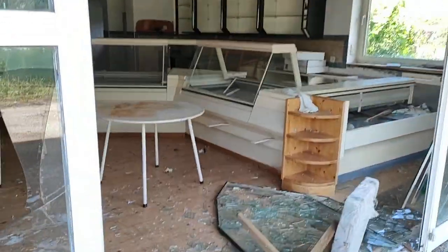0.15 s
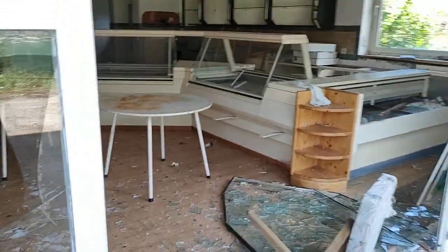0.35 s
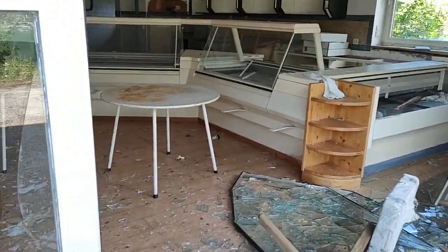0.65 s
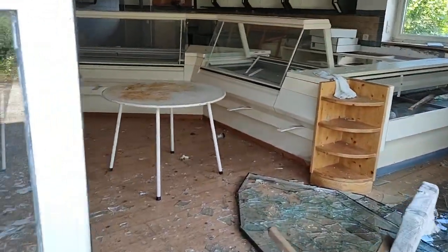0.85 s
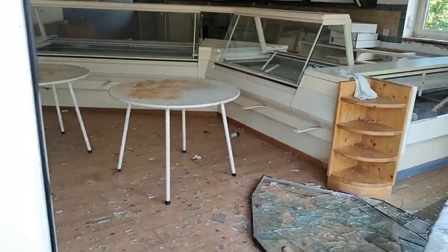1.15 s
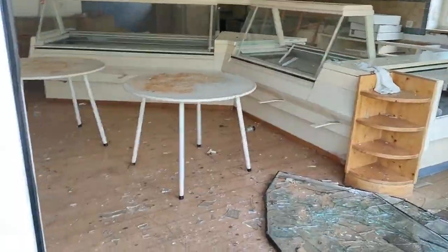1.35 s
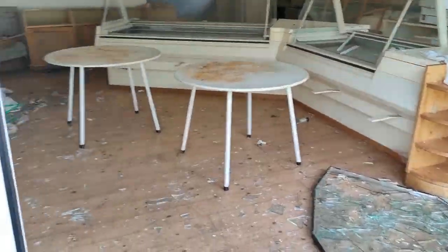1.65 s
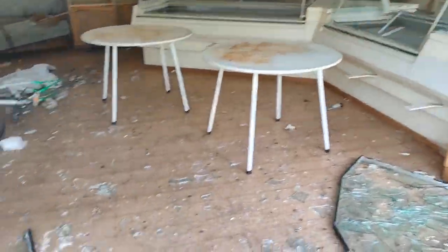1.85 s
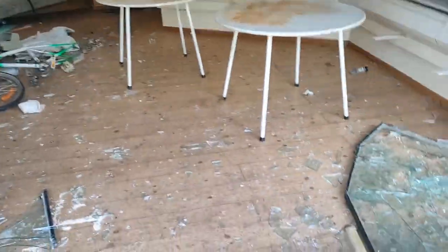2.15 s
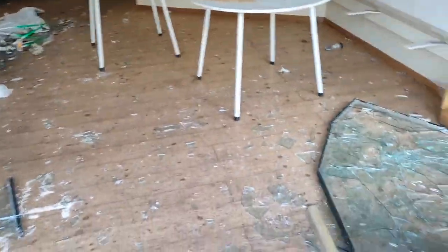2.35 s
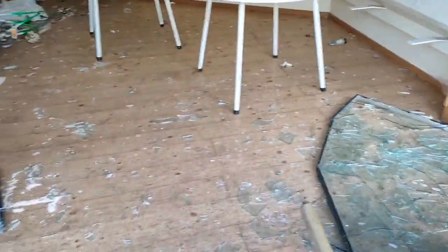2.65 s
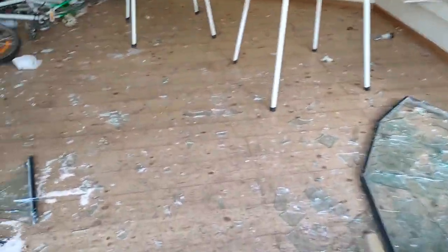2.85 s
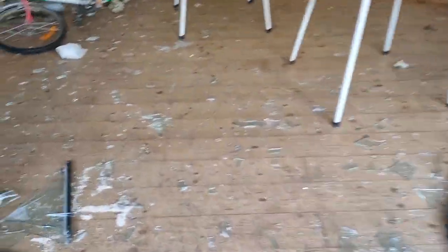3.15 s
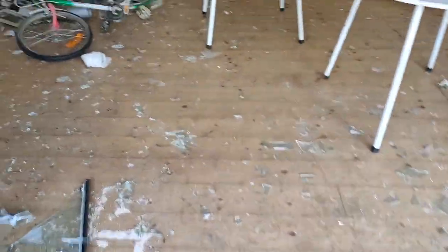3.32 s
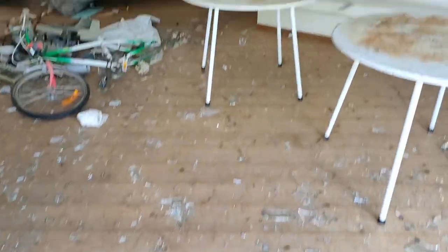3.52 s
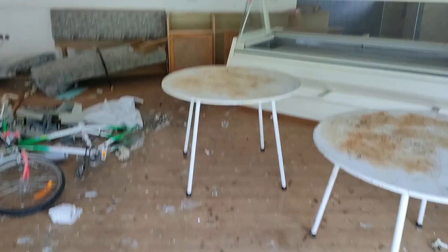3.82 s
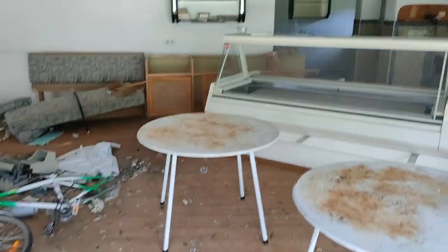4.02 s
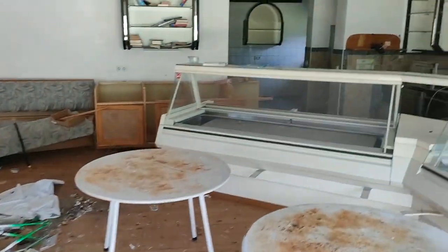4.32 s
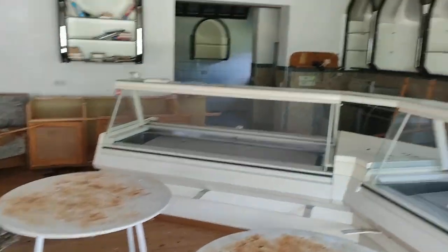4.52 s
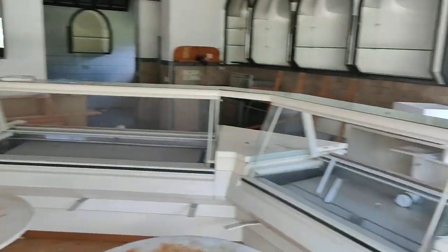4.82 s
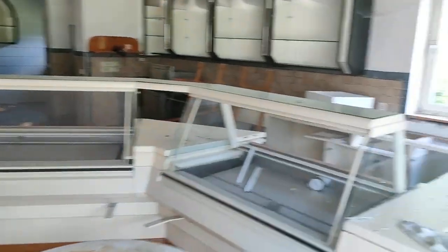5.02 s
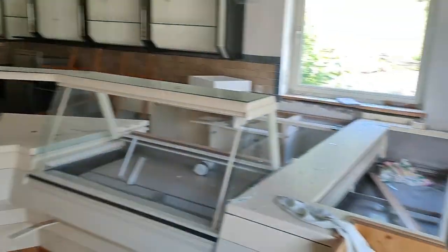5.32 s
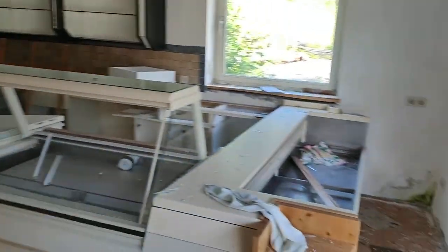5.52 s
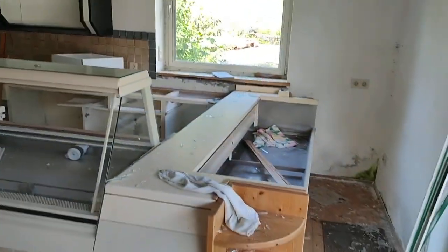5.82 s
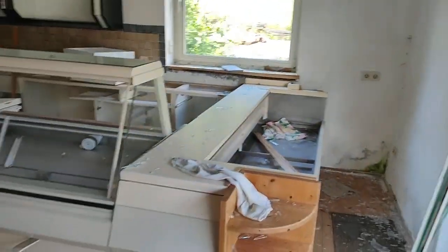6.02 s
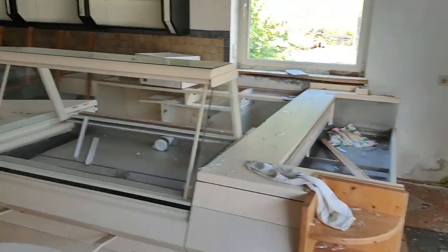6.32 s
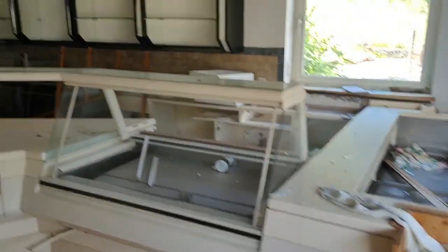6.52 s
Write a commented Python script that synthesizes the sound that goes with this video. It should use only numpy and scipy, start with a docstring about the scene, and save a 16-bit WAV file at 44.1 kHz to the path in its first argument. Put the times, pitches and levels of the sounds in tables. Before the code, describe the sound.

A walker carrying a phone slowly enters an abandoned shop over glass debris. Light cracking and a short lull lead to hard, bright breaking underfoot around three seconds, then denser grit, floor knocks and loose pieces ringing briefly. The later steps are softer, with a small scrape and clinks in the room's short echo, over faint outdoor rumble.

```python
"""Slow steps over broken glass on the floor of an empty shop, heard from a phone held by the walker.
From the start a low rumble and soft hiss (coloured noise) lie under grit ground by the sole (dense clicks)
and shards snapping in runs of fractures (click bursts with a pinched ring); heels thud (short low noise).
Two far hoots (sines) and trouser brushes (noise swells) come next, then pieces dragged with a rasp (resonant
stick-slip) and later ones clinking (beating, decaying modes); the bare room (echo) rings on throughout."""
import sys
import numpy as np
from scipy import signal
from scipy.fft import rfft, irfft
from scipy.io import wavfile
from scipy.ndimage import map_coordinates

SR = 44100
rng = np.random.default_rng(int(sys.argv[2]) if len(sys.argv) > 2 else 0)


def unload_wav(signal):
    """Save mono or channel-first audio to the path in sys.argv[1] as 16-bit WAV at rate SR, clipped to [-1, 1]."""
    wavfile.write(
        sys.argv[1],
        SR,
        np.round(np.clip(np.atleast_2d(signal).T, -1, 1) * 32767).astype(np.int16),
    )


N = 294401
TIME = np.arange(N) / SR

# All event levels are mix levels, set before the room and the limiter.
# steady bed, outdoor rumble and hiss: [pitch_hz, level_db per Hz]
AMBIENCE_COLOUR = [(15, -3.5), (30, 1.5), (42, -3), (58, 7), (75, -8.5), (110, -19), (200, -18.5),
                   (300, -22.5), (700, -29), (2000, -37), (6300, -36), (7300, -46.5), (8300, -59.5),
                   (14000, -52.5), (15900, -84.5)]
# faint far hoots: [centre_s, half_length_s, pitch_hz, level_db]
HOOTS = [(.7, .04, 1300, -63), (2.48, .075, 614, -55)]
# the sole bears down on grit: [start_s, build_up_s, hold_s, grit_db, floor_resonance_db, boards_db]
PRESSES = [(0.005, 0.07, 0.06, -33.5, -41, -68), (0.188, .09, 0.144, -55.5, -55.5, -48),
           (1.358, .02, 0.27, -46, -56, -53), (2.932, .02, 0.081, -43, -79, -55.5),
           (3.117, 0.059, 0.025, -31, -28.5, -74), (3.278, .012, 0.18, -23, -50, -57.5),
           (3.574, 0.016, 0.16, -32.5, -65, -44.5), (3.754, 0.12, 0.23, -35.5, -64, -55),
           (4.037, 0.12, 0.24, -35, -46, -51.5), (4.198, 0.11, 0.031, -30, -41, -40.5),
           (4.245, 0.027, 0.2, -33, -34.5, -33.5), (4.475, 0.12, 0.16, -30.5, -33.5, -45),
           (4.607, .012, 0.11, -28.5, -30.5, -39), (4.692, 0.068, 0.028, -22.5, -29, -30),
           (4.79, 0.022, 0.19, -33.5, -41, -42), (5.375, .02, 0.67, -56, -57, -54),
           (5.649, 0.015, 0.18, -44, -40, -43.5), (5.807, .006, 0.19, -39.5, -49, -46),
           (5.92, 0.0086, 0.11, -39, -44, -34.5)]
# fine splinters in cracks and grit, changing along the walk: [time_s, level_db against the snap]
SPLINTER_SHARE = [(0, -12.5), (1.2, -15.5), (2.9, -8), (3.3, -17.5), (4.6, -13), (5.3, -16.5)]
# colours of breaking glass, struck floor, flying splinters and loaded boards: [pitch_hz, level_db per Hz]
SNAP_COLOUR = [(1200, -31.5), (2200, -4), (3000, 0), (4000, 1.5), (5000, -2), (6800, -1), (7600, -10.5),
               (8100, -17.5), (10000, -23), (15000, -48.5)]
KNOCK_COLOUR = [(150, -32), (400, -5), (700, -8), (1050, 6.5), (1500, 6), (2200, 4), (2900, -9),
                (4500, -45.5)]
SPLINTER_COLOUR = [(6000, -3), (8000, 1), (9000, 3), (10500, 5.5), (13000, 0.5), (15000, -4), (17000, -32)]
BOARDS_COLOUR = [(40, 5), (80, -6), (140, 8.5), (190, 3), (260, 0.5), (330, 3.5), (460, -5.5), (640, 1),
                 (800, -8.5), (1400, -49)]
# the walker comes through the doorway into the room: [time_s, room_send_db]
ROOM_SEND = [(0, -7.5), (1.3, -2.5), (3.1, 6.5), (4.3, 4.5), (6, 2)]
# echo of the bare walls: [pitch_hz, level_db per Hz], then [pitch_hz, t60_s]
ROOM_COLOUR = [(80, -27.5), (300, -1.5), (460, -2), (620, 6.5), (900, -2.5), (1800, 2), (2700, 3.5),
               (4000, 1.5), (6500, 4), (8500, -4), (15000, 2)]
ROOM_T60 = [(100, 0.81), (500, 0.4), (2000, 0.54), (4000, 0.46), (7000, 0.43), (15000, 0.41)]
# shards breaking under the sole:
# [start_s, run_length_ms, snap_db, floor_knock_db, shard_hz, ring_db, left_minus_right_db]
CRACKS = [(0.0098, 1.2, -40, -44, 3400, -36, -5), (0.0311, 2.2, -24.5, -37, 3870, -40, -6),
          (0.034, 5.5, -36, -36.5, 4060, -33, -8), (0.069, 1.1, -48, -51, 3840, -43, -15),
          (0.317, 2.6, -52.5, -63, 2540, -53, -9), (0.992, 4.3, -48.5, -75, 4370, -41.5, -7.5),
          (1.0514, 4.4, -31.5, -60, 4380, -31, 1.5), (1.072, 4.8, -27.5, -45.5, 4200, -23.5, 0),
          (1.094, 2, -60, -61, 4370, -51, 4), (1.1321, 3.4, -19, -34.5, 7420, -26, 9.5),
          (1.146, 11, -47.5, -61, 6140, -39, 1), (1.333, 8.9, -34.5, -49, 7100, -37.5, -0.5),
          (1.37, 9, -36, -54, 3790, -34, -2.5), (1.384, 1.8, -42, -60, 3860, -41.5, -12),
          (1.414, 9.3, -43, -72, 4040, -51, -2), (1.479, 26, -49.5, -78, 6320, -43, -2),
          (1.577, 6.4, -39.5, -62, 4260, -54, -10), (2.009, 6.5, -51.5, -67, 5570, -42.5, -2),
          (2.051, 4.7, -40.5, -77, 7050, -45, 1), (2.079, 1.2, -55, -66, 4430, -27.5, -12.5),
          (2.088, 0.8, -45.5, -68, 3960, -28.5, 16), (2.105, 4.6, -75, -57.5, 4080, -33.5, -12.5),
          (2.931, 15, -34, -81, 3930, -46.5, 7.5), (3.08, 23, -26, -83, 5300, -32, 0.5),
          (3.1007, 62, -22.5, -25, 2740, -50, 13), (3.121, 18, -10, -22.5, 2830, -11, -6.5),
          (3.1722, 8.7, -20, -30.5, 3280, -19.5, -23.5), (3.2677, 1.7, -8, -27, 3140, -54, 1.5),
          (3.277, 6.7, -13.5, -22.5, 3700, -28.5, -9), (3.3069, 5.7, -11.5, -26, 5530, -29.5, 7.5),
          (3.315, 3.8, -19.5, -25, 3830, -24.5, -14), (3.333, 5.4, -45.5, -24, 1250, -28.5, 4),
          (3.359, 2.9, -26.5, -34, 3950, -37.5, -3.5), (3.43, 4.1, -19.5, -47, 3930, -10.5, -1.5),
          (3.438, 1.7, -48, -50, 4090, -22, -20), (3.466, 5.4, -21, -27, 4100, -50.5, -3),
          (3.552, 4, -10, -16.5, 1950, -12.5, 4), (3.846, 8.4, -37, -43, 1140, -51, 14.5),
          (3.888, 6, -67, -56.5, 1210, -49, -6), (3.977, 9.4, -53, -53.5, 1206, -48, 0),
          (4.007, 6.8, -42, -46, 2980, -50, -1), (4.093, 5.3, -45.5, -51, 5260, -47, -9),
          (4.129, 4.8, -53, -46.5, 5590, -33, -5), (4.135, 3, -36, -47, 5820, -28.5, -4),
          (4.21, 5.2, -44.5, -57, 6030, -42, -5.5), (4.241, 9.7, -32, -44, 6470, -30, 4.5),
          (4.2597, 0.86, -22.5, -28.5, 6630, -16.5, -3), (4.266, 1.4, -28, -40, 6620, -26, -0.5),
          (4.274, 8.1, -48, -53, 4480, -39, -5), (4.319, 2.8, -30.5, -35, 6070, -32.5, 1),
          (4.326, 9, -26.5, -30, 6170, -35.5, -7), (4.393, 5, -34.5, -40, 6580, -29, -1),
          (4.414, 4.6, -28, -35.5, 1810, -35, 4), (4.476, 6.7, -42, -38, 833, -30.5, 1),
          (4.4932, 2, -25, -31.5, 6650, -19, -2), (4.503, 9.2, -33, -35.5, 6530, -27, 1.5),
          (4.533, 11, -31.5, -44, 3340, -35, -1.5), (4.5923, 3.3, -21.5, -20.5, 2500, -45, 1),
          (4.6, 4.3, -27.5, -36, 6000, -36, -5), (4.707, 15.5, -34, -38, 2870, -33, -8),
          (4.81, 12, -28.5, -31, 4190, -35, -1), (4.821, 3.8, -27.5, -28, 4160, -31, -2),
          (4.985, 1.5, -37, -52, 3470, -39.5, -2), (5.042, 3.6, -50, -63, 3200, -44, -5),
          (5.242, 2.5, -60, -74, 7030, -83, -3), (5.265, 12, -57.5, -73, 5700, -58, 2),
          (5.342, 1.4, -58, -61, 2900, -64, -4), (5.65, 9.3, -57, -37, 6780, -41, -3),
          (5.7949, 3.2, -39.5, -45.5, 3750, -54, -6), (5.804, 5.4, -40, -56, 3930, -46, -2),
          (5.922, 7.4, -44, -54, 5240, -35, 0), (5.975, 3.3, -44.5, -64, 2350, -38, 4),
          (6.343, 2.2, -75, -83.5, 5520, -72, 0)]
# the phone turns over the feet, so cracks reach the left microphone sooner at first: [time_s, lead_samples]
CRACK_LEAD = [(0, 4), (3.6, 4), (4.1, 1), (6, 1)]
# weight landing on the floor: [start_s, level_db, pitch_hz, t60_s]
THUDS = [(0.267, -40, 203, 0.054), (1.134, -38, 880, 0.061), (2.254, -47, 533, 0.027),
         (2.443, -41.5, 268, 0.032), (3.478, -32, 63, 0.069), (3.552, -25.5, 384, 0.042),
         (4.259, -31, 824, 0.55), (4.707, -29, 200, 0.4), (4.83, -34.5, 615, 0.34), (5.375, -51, 805, 0.14),
         (5.429, -41, 115, 0.17), (5.654, -39, 416, 0.32), (5.885, -46, 554, 0.6),
         (6.005, -35.5, 624, 0.07), (6.005, -33.5, 210, 0.14), (6.622, -36, 135.6, 0.67)]
# trouser legs brushing as the foot swings: [centre_s, spread_s, level_db], then cloth [pitch_hz, level_db per Hz]
BRUSHES = [(1.813, 0.013, -50), (1.861, 0.011, -50), (2.269, 0.045, -49), (2.391, 0.068, -53)]
CLOTH_COLOUR = [(300, -3), (800, 1.5), (1800, -5.5), (3500, 3.5), (7000, 0.5), (8200, -8), (14500, -8),
                (16000, -22)]
# broken pieces dragged under the sole:
# [start_s, length_s, pitch_rise_share, level_db, resonances as [start_pitch_hz, width_hz, level_db]]
SCRAPES = [(2.944, 0.075, .07, -40, [(3720, 420, 0), (3150, 500, -8)]),
           (3.562, .43, .015, -33.5, [(1860, 240, -2.5), (2180, 400, -4), (2600, 400, 0), (3300, 900, -5),
           (1420, 180, -14), (4200, 500, -9), (5200, 700, -10)]), (5.652, .032, 0, -29.5, [(2650, 130, 0),
           (6800, 500, -6), (4100, 700, -11), (1200, 1200, -8)]), (5.927, .1, 0, -41, [(2240, 190, 0),
           (1950, 130, -7), (3300, 900, -9), (5000, 600, -8)])]
# loose pieces that ring until the foot pins them:
# [start_s, ringing_s, level_db, rattle_share of the first touch, modes as [pitch_hz, level_db, t60_s]]
CLINKS = [(4.707, .105, -23.5, .25, [(2835, 0, .5), (2925, -7, .35), (2260, -11, .3), (3320, -8, .3),
          (5100, -10, .25), (5290, -10, .25), (5820, -12, .25), (7560, -12, .3)]),
          (4.82, .39, -28, .3, [(4268, 0, .64), (4190, -6, .45), (3510, -8, .6), (3330, -11, .45),
          (2842, -8, .6), (5330, -13, .45), (6627, -11, .5), (7380, -10, .42), (8560, -20, .35),
          (10630, -24, .35)]), (5.653, .13, -28.5, .2, [(2638, 0, .62), (6212, -9, .36), (6821, -5, .33),
          (7050, -11, .2)]), (5.794, .13, -38, .4, [(4780, -1, .35), (3817, -1, .17), (3960, -3, .13),
          (3380, -6, .15), (5238, -9, .2), (5690, -3, .3), (6831, -9, .4)]),
          (5.925, .195, -32, .4, [(2200, 0, .7), (2262, -1, .48), (2350, -9, .25), (2080, -9, .25),
          (1940, -6, .35), (3327, -13, .3), (3467, -15, .25), (3970, -11, .22), (4810, -8, .28),
          (5020, -10, .2), (5260, -8, .3), (6961, -10, .28)])]

AMBIENCE_DB = -47  # ahead of its slow waver
# between presses the standing foot keeps stirring, less towards the end: [grit_db, floor_resonance_db, boards_db]
STIR_DB, STIR_FALL_DB_PER_S = (-61.5, -64, -57.5), 1
# each press eases while the grit is crushed and dies as the foot lifts
PRESS_EASE_DB_PER_S, PRESS_RELEASE_T60_S = 26.5, 0.12
GRIT_SPLINTER_DB = 2  # on top of the splinter share
GRIT_TRIM_DB = -6
# sends to the room: the first is on top of the walker's send
FRICTION_ROOM_DB, THUD_ROOM_DB, CLINK_ROOM_DB = -1.5, -2.5, -10
RING_ROOM_SHARE = 0.51
# size of the opening break against a small fracture, and the run length that halves it
FIRST_BREAK, FIRST_BREAK_S = 10.3, 0.00416
# per octave below a typical shard, a larger piece fills the room more and throws fewer splinters
TYPICAL_SHARD_HZ, LARGER_ROOM_DB, LARGER_SPLINTER_DB = 4150, 1.5, -0.5
# every floor knock also shakes the floor's low modes: level against the knock, pitch, decay
SHAKE_DB, SHAKE_HZ, SHAKE_T60_S = -15, 412, 0.029
SCRAPE_SLIPS_PER_S, SCRAPE_ATTACK_S, SCRAPE_EASE = 950, 0.005, 1.3
RATTLE_PER_S, RATTLE_T60_S = 320, 0.34
CLINK_FLUTTER, FLUTTER_PER_S, CLINK_DAMPED_T60_S = 0.38, 130, 0.08
PORT_LAG = 2  # usual lead of the left microphone, in samples
LIMIT_DB, LIMIT_S, TOP_HZ = -21, 0.04, 15900


def undb(db):
    """Decibels to gain."""
    return 10 ** (np.asarray(db) / 20)


def unit(x):
    """Scale to an rms of 1."""
    return x / np.sqrt(np.mean(x ** 2) + 1e-18)


def fade(t, t60):
    """Exponential decay, 60 dB in t60."""
    return np.exp(-np.log(1000) * t / t60)


def follow(curve, time):
    """Read a breakpoint curve at the given time."""
    return np.interp(time, *np.transpose(curve))


def wander(per_s):
    """A random course that takes a new value per_s times a second."""
    knots = np.arange(0, TIME[-1] + 1, 1 / per_s)
    return np.interp(TIME, knots, rng.standard_normal(len(knots)))


def band(x, lo_hz, hi_hz, order=2):
    """Band-pass filter."""
    edges = [lo_hz, min(hi_hz, 0.45 * SR)]
    return signal.sosfilt(signal.butter(order, edges, "band", fs=SR, output="sos"), x)


def colour(x, points):
    """Causal filter with the given spectral outline and unit power gain."""
    hz, db = np.transpose(points)
    freqs = np.fft.rfftfreq(8192, 1 / SR)
    gain = unit(undb(np.interp(np.log(freqs + 1), np.log(hz), db)))
    # folding the cepstrum forward gives minimum phase: no sound before the event
    cepstrum = irfft(np.log(gain))
    fold = 1 + np.sign(len(cepstrum) / 2 - np.arange(len(cepstrum)))
    fold[0] = 1
    response = irfft(np.exp(rfft(cepstrum * fold)))
    return signal.fftconvolve(x, response[None], axes=1)[:, :x.shape[1]]


def add(out, s, x):
    """Mix a stereo sound in at time s."""
    i = max(int(s * SR), 0)
    out[:, i:i + x.shape[1]] += x[:, :max(N - i, 0)]


def ports(x, scatter=0.42, t60=0.03, lag=PORT_LAG):
    """Two microphones hear the direct sound, the left a little sooner, then each its own decaying scatter."""
    t = TIME[:SR // 20]
    paths = rng.standard_normal((2, len(t))) * fade(t, t60)
    paths *= scatter / np.sqrt(np.sum(paths ** 2, axis=1, keepdims=True))
    paths[0, 0] += 1
    paths[1, lag] += 1
    heard = signal.fftconvolve(x[None], paths, axes=1)[:, :len(x)]
    return heard / np.sqrt(1 + scatter ** 2)


def fractures(count, per_s, spread_db):
    """Brittle breaks as random clicks of either sign: many small, a few large."""
    size = undb(spread_db * np.minimum(rng.exponential(size=count), 3.5))
    return (rng.random(count) < per_s / SR) * size * rng.choice([-1, 1], count)


def ambience():
    """A wavering outdoor rumble and hiss, partly shared by both microphones, with two far hoots."""
    noise = 0.5 * rng.standard_normal(N) + 0.51 * rng.standard_normal((2, N))
    waver_db = 1.6 * wander(per_s=6)
    bed = colour(noise, AMBIENCE_COLOUR) * undb(AMBIENCE_DB + waver_db)
    for s, half, hz, db in HOOTS:
        swell = np.exp(-((TIME - s) / half) ** 4)
        bed = bed + undb(db) * swell * np.sin(2 * np.pi * hz * TIME)
    return bed


def pressure():
    """Sole force on grit, floor resonances and boards: build-up, easing hold and release per press."""
    drive = undb(STIR_DB)[:, None] * undb(-STIR_FALL_DB_PER_S * TIME)
    for s, build_up, hold, *levels_db in PRESSES:
        t = TIME - s
        attack = np.clip(1 + t / build_up, 0, 1) ** 2  # builds up ahead of the start time
        ease = undb(-PRESS_EASE_DB_PER_S * np.clip(t, 0, hold))
        release = fade(np.maximum(t - hold, 0), PRESS_RELEASE_T60_S)
        press = undb(levels_db)[:, None] * (attack * ease * release)
        drive = np.maximum(drive, press)
    return drive


def crumbs(lo_hz, hi_hz, cycles, count):
    """Crumbs that pop at random as decaying sines, each with its own pitch, size and place."""
    out, t = np.zeros((2, N)), TIME[:SR // 30]
    for when, pitch, size, side, turn in rng.random((count, 5)):
        hz = lo_hz * (hi_hz / lo_hz) ** pitch
        phase = np.array([[0], [turn / 2]])
        pop = np.sin(2 * np.pi * (hz * t + phase)) * fade(t, cycles / hz)
        place = np.sqrt([[side], [1 - side]])
        add(out, when * TIME[-1], pop * place * undb(10 * size ** 2))
    return unit(out)


def grinding():
    """Fine glass crumbles in dense tiny clicks and larger crumbs, which also drive the floor under the sole."""
    grit, knock, boards = pressure()
    grains = fractures(N, per_s=560, spread_db=4.6)
    force = unit(ports(grains, scatter=1, t60=0.035))
    skitter = unit(ports(grains, scatter=3, t60=0.08))
    splinter_db = follow(SPLINTER_SHARE, TIME) + GRIT_SPLINTER_DB
    bright = colour(force, SNAP_COLOUR) + undb(splinter_db) * colour(skitter, SPLINTER_COLOUR)
    bright = bright + 0.85 * crumbs(2400, 7400, cycles=40, count=900)
    dull = colour(force, KNOCK_COLOUR) + 0.45 * crumbs(800, 2300, cycles=16, count=600)
    creak = colour(unit(ports(grains, scatter=0.26)), BOARDS_COLOUR)
    # the sole sticks and slips, so the grit comes in spurts
    slip = undb(3 * wander(per_s=60))
    return slip * (grit * bright + knock * dull) + boards * creak


def room(x):
    """Diffuse echo with a decay for each pitch region; the bass is alike at both microphones."""
    t = TIME[:3 * SR // 2]
    freqs = np.fft.rfftfreq(len(t), 1 / SR)
    middle, side = rfft(rng.standard_normal((2, len(t))))
    apart = np.minimum(freqs / 1100, 1)
    noise = (middle + np.array([[1], [-1]]) * apart * side) / np.sqrt(1 + apart ** 2)
    # crossfaded pitch regions, each dying at its own rate
    hz, t60 = np.transpose(ROOM_T60)
    shares = [np.interp(np.log(freqs + 1), np.log(hz), row) for row in np.eye(len(hz))]
    tail = sum(irfft(noise * share, len(t)) * fade(t, d) for share, d in zip(shares, t60))
    onset = 1 - np.exp(-t / 0.0004)
    tail = colour(unit(tail * onset), ROOM_COLOUR) / np.sqrt(len(t))
    return signal.fftconvolve(x, tail, axes=1)[:, :N]


def pinched_ring(force, shard_hz):
    """A shard held under the sole rings briefly in five crowded modes."""
    t = TIME[:force.shape[1]]
    modes = 0
    for step in range(-2, 3):
        hz = shard_hz * (1 + 0.04 * (step + rng.uniform(-0.3, 0.3)))
        modes = modes + np.sin(2 * np.pi * (hz * t + rng.random())) / (1 + abs(step))
    modes = modes * fade(t, 0.022)
    ring = signal.fftconvolve(force, modes[None], axes=1)[:, :len(t)]
    return band(ring, shard_hz / 1.223, shard_hz * 0.986)


def crack(ms, snap_db, knock_db, splinter_db, shard_hz, ring_db, lag):
    """A run of fractures snaps, knocks the floor and throws splinters; returns that burst and the shard's ring."""
    t = TIME[:SR // 7]
    length = ms / 1000
    envelope = np.exp(-(t / length) ** 4) * np.minimum(t / length + 0.4, 1)
    run = fractures(len(t), per_s=1800, spread_db=4.5) * envelope
    # a short run is mostly its first break
    run[SR // 2000] += FIRST_BREAK / (1 + length / FIRST_BREAK_S)
    # bending waves spread each click over a millisecond or less, the highs arriving first
    travel = t[:int(rng.uniform(0.0005, 0.001) * SR)]
    spread = signal.chirp(travel, 17000, travel[-1], 0, phi=90)
    bent = np.convolve(run, spread)[:len(t)]
    force = ports(bent, scatter=min(0.5 + length / 0.015, 0.9), t60=0.026, lag=lag)
    # the splinters skitter on for a moment
    skitter = ports(run, scatter=2, t60=0.07)
    # a small shard radiates little below its own pitch
    snap = band(colour(force, SNAP_COLOUR), min(0.78 * shard_hz, 3700), 11000, order=3)
    knock = colour(force, KNOCK_COLOUR)
    splinters = colour(skitter, SPLINTER_COLOUR)
    burst = unit(snap) * undb(snap_db) + unit(knock) * undb(knock_db) + unit(splinters) * undb(splinter_db)
    ring = unit(pinched_ring(force, shard_hz)) * undb(ring_db)
    # each level holds for as long as the run and its first scatter last
    size = np.sqrt((length + 0.005) * SR / len(t))
    return size * burst, size * ring


def thud(db, hz, t60):
    """The floor's crowded low modes, pushed by a soft heel or shaken by a crack: band-passed dying noise."""
    t = TIME[:SR // 2]
    decay = fade(t, t60)
    push = rng.standard_normal((1, len(t))) * decay
    body = unit(band(push, hz / 1.35, hz * 1.328, order=3))
    # a longer decay carries more energy at the same level
    return body * undb(db) * np.sqrt(np.mean(decay ** 2)) * np.ones((2, 1))


def brushing():
    """Cloth slides over cloth in soft swells of hiss: countless fibres, partly shared by the microphones."""
    swell = sum(undb(db) * np.exp(-((TIME - s) / spread) ** 2 / 2) for s, spread, db in BRUSHES)
    fibres = unit(rng.standard_normal((2, N)) + 0.54 * rng.standard_normal(N))
    return swell * colour(fibres, CLOTH_COLOUR)


def scraping():
    """A dragged piece sticks and slips, rattling its modes; some rise as the sole pinches, all fade to rest."""
    out = np.zeros((2, N))
    for s, length, rise, level_db, resonances in SCRAPES:
        t = TIME[:int(length * SR)]
        slips = ports(fractures(2 * len(t), per_s=SCRAPE_SLIPS_PER_S, spread_db=3), t60=0.067)
        rasp = 0
        for hz, width, db in resonances:
            rasp = rasp + unit(band(slips, hz - width / 2, hz + width / 2)) * undb(db)
        # reading ever faster bends the pitch up
        course = SR * t * (1 + rise * t / length / 2)
        rasp = np.array([map_coordinates(side, [course]) for side in rasp])
        envelope = np.minimum(t / SCRAPE_ATTACK_S, 1) * (1 - t / length) ** SCRAPE_EASE
        add(out, s, rasp * undb(level_db) * envelope)
    return out


def clink(held, level_db, rattling, modes):
    """A loose piece rings in close, beating pairs of modes, chatters and rattles on the floor, then is damped."""
    t = TIME[:SR // 2]
    rattle = fractures(len(t), per_s=RATTLE_PER_S, spread_db=3) * fade(t, RATTLE_T60_S)
    rattle = unit(rattle) * rattling / np.sqrt(len(t))
    rattle[0] = 1  # the first touch
    tone = 0
    for hz, db, t60 in modes:
        pair = 0
        for size, shift_hz in ((1, 0), (0.45, rng.uniform(12, 38))):
            phase = rng.random((2, 1)) / 3
            pair = pair + size * np.sin(2 * np.pi * ((hz + shift_hz) * t + phase))
        tone = tone + unit(pair) * fade(t, t60) * undb(level_db + db) / np.sqrt(2)
    ring = signal.fftconvolve(tone, rattle[None], axes=1)[:, :len(t)] / np.sqrt(1 + rattling ** 2)
    chatter = 1 + CLINK_FLUTTER * wander(FLUTTER_PER_S)[:len(t)]
    return ring * chatter * fade(np.maximum(t - held, 0), CLINK_DAMPED_T60_S)


def scene():
    """All sounds of the feet, near and through the room, over the ambience."""
    near = grinding() * undb(GRIT_TRIM_DB) + brushing() + scraping()
    to_room = near * undb(follow(ROOM_SEND, TIME) + FRICTION_ROOM_DB)
    for s, ms, snap_db, knock_db, shard_hz, ring_db, pan_db in CRACKS:
        larger = np.log2(TYPICAL_SHARD_HZ / shard_hz)  # octaves below a typical shard
        splinter_db = snap_db + follow(SPLINTER_SHARE, s) + LARGER_SPLINTER_DB * larger
        room_db = follow(ROOM_SEND, s) + LARGER_ROOM_DB * larger
        lag = round(follow(CRACK_LEAD, s))
        burst, ring = crack(ms, snap_db, knock_db, splinter_db, shard_hz, ring_db, lag)
        place = undb([[pan_db / 2], [-pan_db / 2]])
        add(near, s, (burst + ring) * place)
        add(near, s, thud(knock_db + SHAKE_DB, SHAKE_HZ, SHAKE_T60_S))
        # the floor carries the burst into the room better than the small shard carries its ring
        add(to_room, s, (burst + RING_ROOM_SHARE * ring) * undb(room_db))
    for s, db, hz, t60 in THUDS:
        sound = thud(db, hz, t60)
        add(near, s, sound)
        add(to_room, s, sound * undb(THUD_ROOM_DB))
    for s, *piece in CLINKS:
        sound = clink(*piece)
        add(near, s, sound)
        add(to_room, s, sound * undb(CLINK_ROOM_DB))
    # the bare walls lie mostly to the right
    return near + undb([[-8], [-6]]) * room(to_room) + ambience()


def record(dry):
    """The phone turns itself down as the smoothed power rises, rounds the peaks and cuts the top."""
    keep = np.exp(-1 / (LIMIT_S * SR))
    power = signal.lfilter([1 - keep], [1, -keep], np.mean(dry ** 2, axis=0))
    held = dry / np.sqrt(1 + power / undb(LIMIT_DB) ** 2)
    rounded = 0.85 * np.tanh(held / 0.85)
    return signal.sosfilt(signal.ellip(10, 0.2, 80, TOP_HZ, fs=SR, output="sos"), rounded)


dry = scene()
out = record(dry)
unload_wav(out)
```